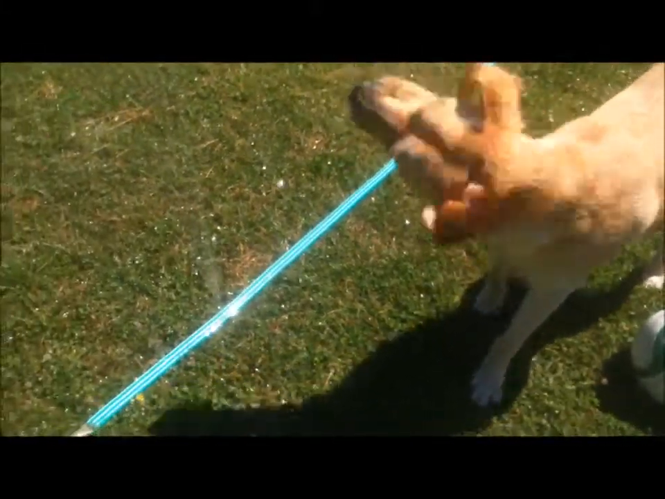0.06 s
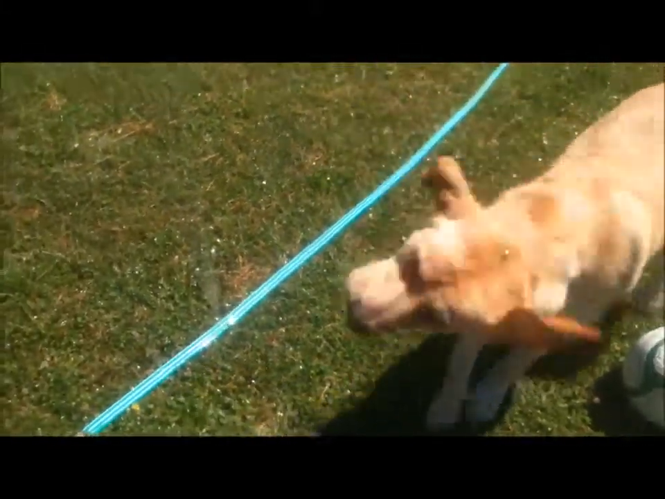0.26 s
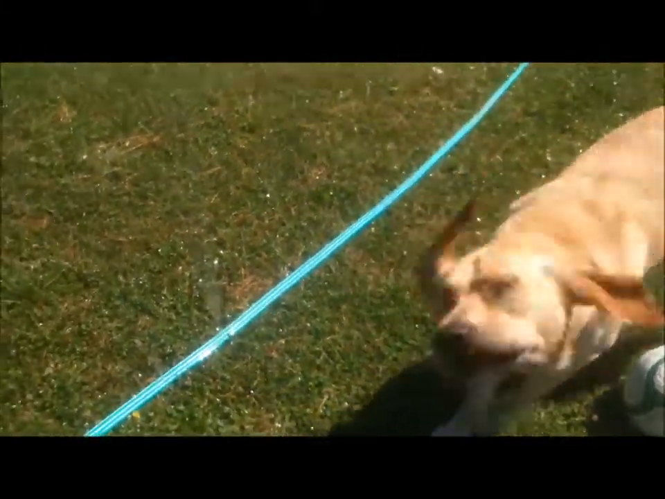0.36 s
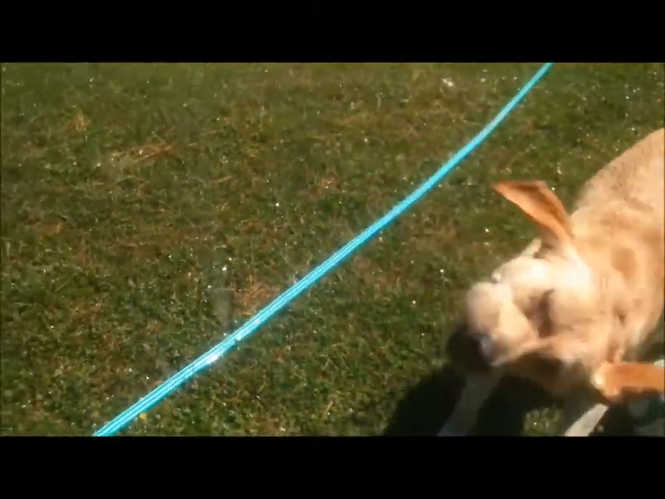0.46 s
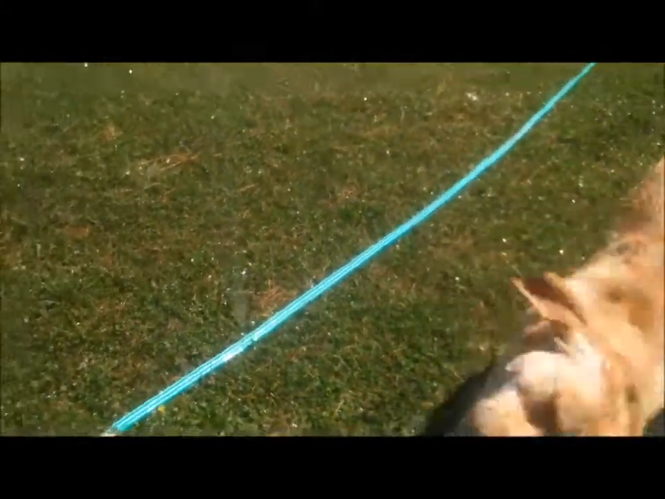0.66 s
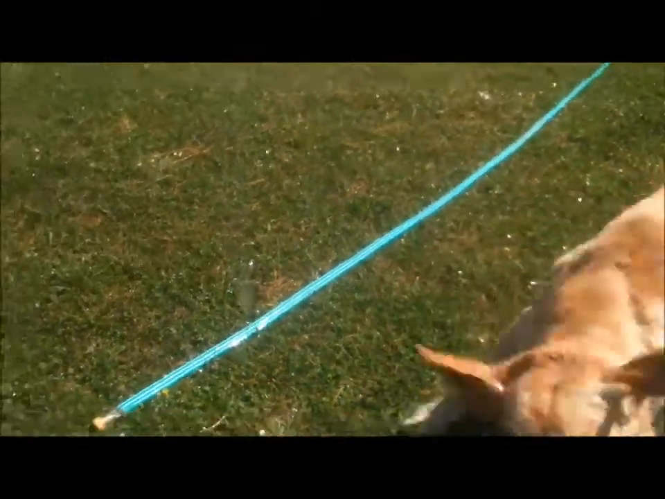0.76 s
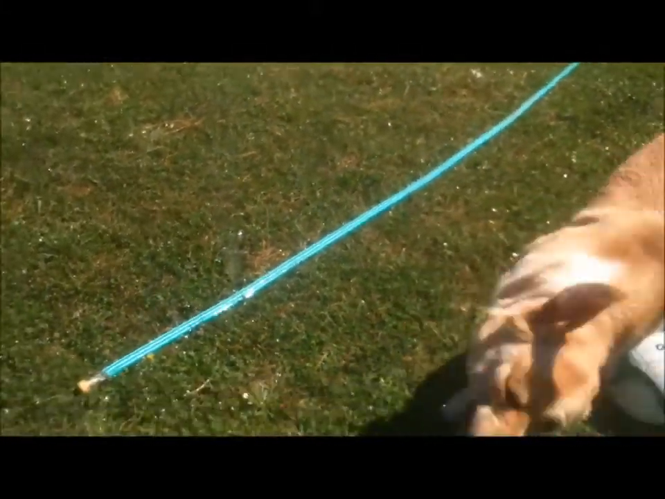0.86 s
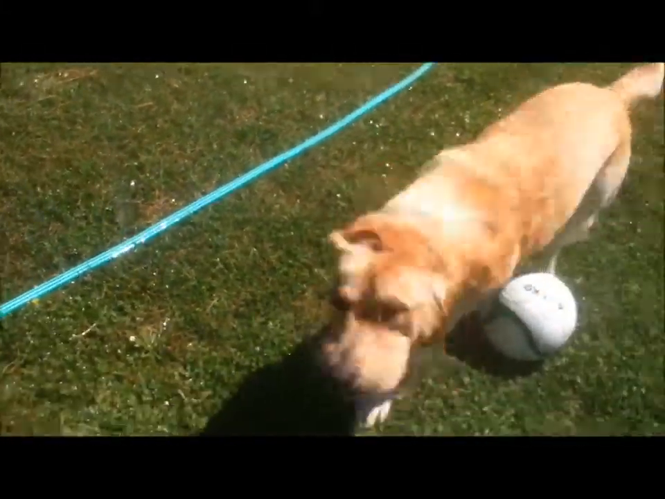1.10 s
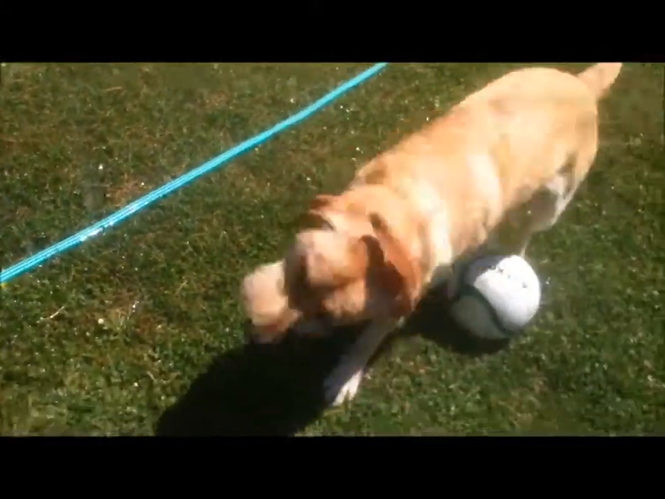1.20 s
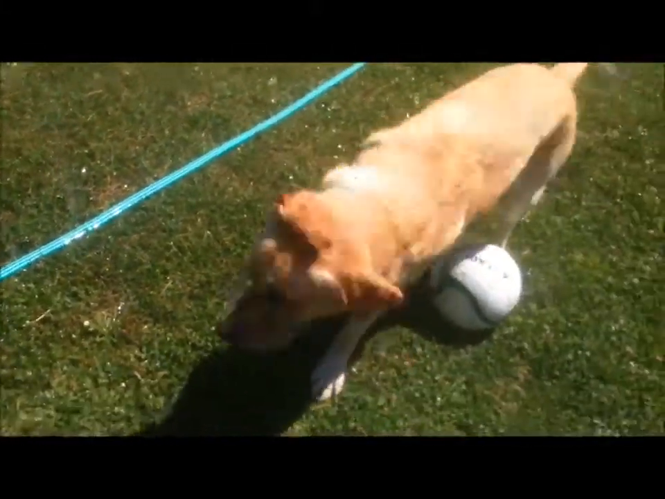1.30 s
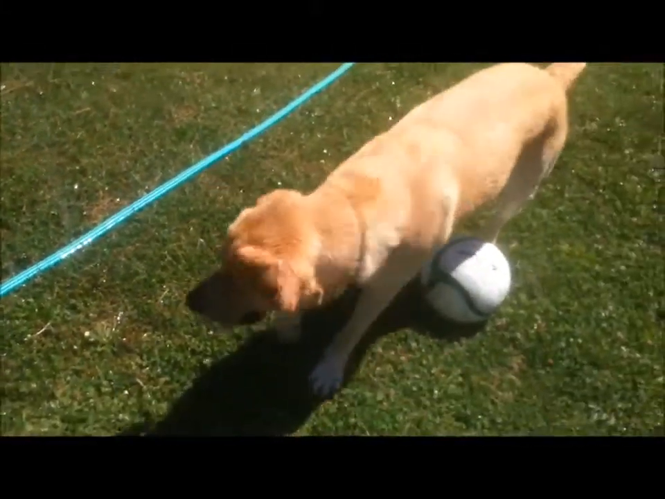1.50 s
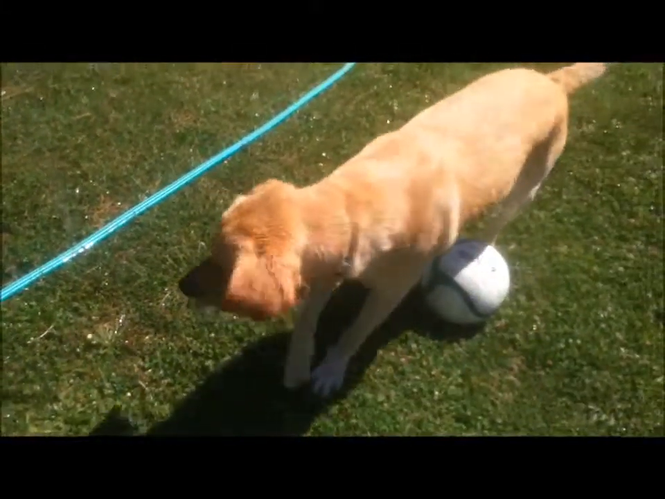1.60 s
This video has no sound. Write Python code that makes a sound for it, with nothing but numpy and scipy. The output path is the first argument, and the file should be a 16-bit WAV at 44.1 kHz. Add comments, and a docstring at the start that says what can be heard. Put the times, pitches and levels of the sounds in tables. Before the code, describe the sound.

Close by on a lawn, a dog's wet ears flap in a fast burst of slaps as it shakes its head, with light fur rustle and ticking drops. A faint hose hiss and low outdoor rumble continue underneath.

```python
"""A wet dog shakes its head on a lawn, close by. Ears and lips slap about eleven times a second:
each slap is a thump of trapped air, a clap of skin and a wet crack, a few milliseconds apart.
The mouth rings once with the second slap. Fur rustles, drops tick, cheeks pop, the turf thuds dully.
A sprinkler hose hisses over a low outdoor rumble."""
import numpy as np
from scipy import signal
from scipy.fft import rfft, irfft
import sys
import numpy as np
from scipy import signal
from scipy.fft import rfft, irfft
from scipy.io import wavfile

SR = 44100
rng = np.random.default_rng(int(sys.argv[2]) if len(sys.argv) > 2 else 0)


def wav_record(signal):
    """Record a signal, one row per channel, as 16-bit PCM in the file named by sys.argv[1]."""
    frames = np.transpose(np.atleast_2d(signal))
    bounded = np.clip(frames, -1, 1)
    # unit amplitude maps onto the largest positive 16-bit level
    quanta = np.round(bounded * 32767).astype(np.int16)
    wavfile.write(sys.argv[1], SR, quanta)


N = 72765
T = np.arange(N) / SR
HZ = np.maximum(np.fft.rfftfreq(N, 1 / SR), 1)

# Vigour of the shake. Each row: time in seconds, rustle level in dB.
FUR_LEVEL = [(0, -59), (.2, -56), (.35, -50), (.41, -51.5), (.55, -51), (.7, -51), (.9, -50), (1.15, -51),
             (1.33, -50.5), (1.42, -52), (1.5, -60), (1.65, -56)]
# Fur spectrum. Each row: frequency in Hz, relative density in dB.
FUR_SPECTRUM = [(60, -49), (120, 2.5), (400, 4.5), (800, -6), (1500, -4.5), (3500, -5), (7000, -3.5),
                (10000, -7.5), (16000, -21.5)]
# Hose hiss over time. Each row: time in seconds, level in dB.
SPRAY_LEVEL = [(0, -50.5), (.5, -54.5), (1.2, -54), (1.5, -52.5), (1.65, -54.5)]
# Spectrum of spray and open air. Each row: frequency in Hz, relative density in dB.
SPRAY_SPECTRUM = [(60, -5), (150, -6.5), (300, -4), (430, -5), (600, -13), (1000, -10), (1500, -13.5),
                  (2500, -15), (4000, -12.5), (5800, -6), (7500, -5), (10000, -11), (12500, -20),
                  (16000, -23)]
# Rumble over time. Each row: time in seconds, level in dB.
RUMBLE_LEVEL = [(0, -58.5), (.3, -52.5), (.4, -65.5), (.6, -52), (.78, -52.5), (.87, -56.5), (1.25, -48),
                (1.4, -55.5), (1.65, -63)]
# Rumble spectrum. Each row: frequency in Hz, relative density in dB.
RUMBLE_SPECTRUM = [(20, -31), (38, -54), (50, 1.5), (62, -8.5), (85, -10), (120, -14.5), (250, -46)]
# Drop and lip ticks. Each row: time in seconds, level in dB, centre in Hz, width in octaves,
# length in seconds.
TICKS = [(0.05, -64, 7500, .5, 0.0026), (0.0897, -36.5, 7900, .5, 0.0012),
         (0.134, -47.5, 1960, 1.4, 0.0029), (0.2665, -46, 2170, 0.94, 0.0047),
         (0.289, -46, 1760, 0.18, 0.005), (0.291, -25, 10400, 0.26, 0.0013),
         (0.338, -30.5, 4200, 0.37, 0.0018), (0.361, -45, 2200, 2, 0.0071),
         (0.447, -41.5, 5930, 2.7, 0.0078), (0.5193, -32, 8800, 0.31, 0.0026),
         (0.5194, -36.5, 3500, 0.27, 0.0033), (0.553, -47, 6000, 0.89, 0.0016),
         (0.588, -45, 2780, 0.12, 0.0033), (0.6183, -36.5, 4170, 0.18, 0.0012),
         (.619, -35.5, 9800, .3, 0.0012), (0.684, -34, 3860, 1.2, 0.0018), (0.709, -44.5, 3000, 2, 0.012),
         (.7778, -39.5, 4900, 0.79, 0.0062), (.892, -38.5, 4900, 3.9, 0.0044),
         (0.973, -44.5, 3850, 0.6, 0.0035), (1.0755, -28, 7870, 0.27, 0.0024),
         (1.157, -42, 5200, 0.56, 0.0054), (1.251, -43, 2580, 0.9, 0.0037), (1.337, -44, 4200, 0.85, 0.011),
         (1.4, -34.5, 4820, 0.72, .002)]
# Ear slaps. Each row: crack time in seconds, level in dB, length in seconds, treble tilt in dB/octave,
# fold resonance in Hz, its boost in dB; thump lead in seconds, pitch in Hz, ring in seconds,
# level in dB; clap lead in seconds, centre in Hz, level in dB.
SLAPS = [ (0.2298, -24.5, .0014, 1.5, 9300, 17.5, 0.0037, 446, 0.0031, -39, 0.0011, 1380, -23),
         (0.3202, -21.5, 0.0028, 0.5, 10460, 14.5, .001, 330, 0.0027, -22.5, 0.0014, 1220, -30.5),
         (0.453, -28, 0.0021, -1.5, 5150, 7, 0.0059, 399, 0.0074, -32, -0.0012, 990, -25),
         (0.5624, -34, 0.0045, 0, 7400, 10, .0083, 456, 0.0036, -32, .009, 1070, -36.5),
         (.6500, -21, .0038, 3.5, 5600, 5.5, -0.0011, 404, 0.0051, -27.5, 0.0019, 1530, -36),
         (0.7463, -18.5, .0025, 4.5, 8250, 2, 0.0049, 435, 0.002, -30.5, 0.0028, 1700, -52),
         (.8340, -19.5, .0031, -0.5, 3640, 11.5, .0015, 437, .003, -17, 0.0077, 1050, -28),
         (0.9307, -26, 0.0048, 3.5, 6260, 7, 0.0093, 414, 0.004, -23.5, 0.005, 1050, -37),
         (1.0185, -22.5, 0.0045, -0.5, 2950, 7.5, .004, 467, 0.0046, -21, 0.00385, 697, -28.5),
         (1.1136, -25.5, 0.0042, -1, 7140, 9, 0.0061, 366, 0.0018, -21, 0.0074, 950, -29.5),
         (1.205, -21.5, 0.0036, -0.5, 3750, 8, 0.0079, 399, .0038, -20.5, 0.0074, 930, -30.5),
         (1.2916, -25, 0.0037, 1, 5300, 5.5, 0.005, 306, 0.0021, -27.5, .0015, 1000, -36.5),
         (1.3823, -41, 0.0083, -6, 5870, 11.5, .0026, 340, 0.0023, -29.5, .0003, 930, -46)]
# Wet crack spectrum. Each row: frequency in Hz, relative density in dB.
CRACK_SPECTRUM = [(500, -1), (1400, -5.5), (1800, 2), (2300, -0.5), (2800, -4.5), (3400, 9.5), (3700, 1),
                  (4000, 4), (4700, 7), (5400, 0), (6000, 4), (7600, 0), (9800, 0), (12000, -9.5),
                  (16000, -26)]
# Lip and cheek pops. Each row: start in seconds, level in dB, pitch in Hz.
POPS = [(.261, -40, 1010), (.372, -39, 420), (.681, -37, 775), (.774, -40, 748), (.860, -44, 780),
        (1.136, -34, 800), (1.228, -37, 786), (1.318, -39, 794), (1.423, -47, 603)]
# Open-mouth modes. Each row: frequency in Hz, level in dB, T60 in seconds.
MOUTH_MODES = [(714, -18, 0.036), (1830, -23.5, 0.024), (4070, -12.5, 0.017), (9930, -20.5, 0.014)]
# Thuds, as of paws on turf. Each row: time in seconds, pitch in Hz, peak in dB.
THUDS = [(.455, 58, -46), (.555, 66, -46), (.713, 68, -39), (.92, 72, -45), (1.075, 72, -47),
         (1.195, 72, -46)]


def from_db(db):
    """Decibels to gain."""
    return 10 ** (np.asarray(db) / 20)


def level(rows):
    """Gain over time from (s, dB) points."""
    return from_db(np.interp(T, *np.transpose(rows)))


def spectrum_db(points):
    """dB per bin from (Hz, dB) points."""
    hz, db = np.transpose(points)
    return np.interp(np.log(HZ), np.log(hz), db)


def resonance_db(hz, octaves, skirt_db):
    """Broad resonance on a low skirt, dB per bin."""
    offset_oct = np.log2(HZ / hz)
    peak = np.exp(-.5 * (offset_oct / octaves) ** 2)
    return 20 * np.log10(peak + from_db(skirt_db) / (1 + offset_oct ** 4))


def noise(shape_db, grain_db=0):
    """Coloured noise, rms 1; grain_db makes the grains uneven."""
    grains = rng.standard_normal(N) * from_db(grain_db * np.minimum(rng.exponential(1, N), 6))
    x = irfft(rfft(grains) * from_db(shape_db), N)
    return x / np.std(x)


def swell(peak_s, rise_s, fall_s):
    """Envelope: rounded rise to 1, then decay."""
    t = T - peak_s
    return np.where(t < 0, np.exp(-(t / rise_s) ** 2), np.exp(1 - np.sqrt(1 + (2 * t / fall_s) ** 2)))


def spatter(peak_s, length_s, shape_db):
    """Burst of tiny contacts, then faint scatter from the surroundings."""
    envelope = swell(peak_s, rise_s=.65 * length_s, fall_s=length_s)
    direct = noise(shape_db, grain_db=3) * envelope
    direct *= np.sqrt(np.sum(envelope ** 2) / np.sum(direct ** 2))
    scatter = noise(shape_db) * swell(peak_s + length_s, rise_s=length_s, fall_s=.0112)
    return direct + from_db(-28) * scatter


def cavity(start_s, hz, db, t60_s, rise_s=.0016):
    """One damped mode of an air cavity."""
    t = np.maximum(T - start_s, 0)
    decay = from_db(db - 60 * np.minimum(t / t60_s, 2))
    return decay * (1 - np.exp(-t / rise_s)) * np.sin(2 * np.pi * hz * t)


def fur_rustle(gain):
    """Wet fur rustles in fine grains."""
    return gain * noise(spectrum_db(FUR_SPECTRUM), grain_db=2.4)


def hose_spray():
    """Fine spray gives a grainy hiss."""
    return level(SPRAY_LEVEL) * noise(spectrum_db(SPRAY_SPECTRUM), grain_db=2.5)


def rumble():
    """Low outdoor noise, wavering in level."""
    return level(RUMBLE_LEVEL) * noise(spectrum_db(RUMBLE_SPECTRUM))


def wet_ticks(top_hz=10500):
    """Small wet contacts of drops and lips, dull at the very top."""
    lowpass_db = -10 * np.log10(1 + (HZ / top_hz) ** 10)
    return sum(from_db(db) * spatter(at_s, length_s, lowpass_db + resonance_db(hz, octaves, skirt_db=-44))
               for at_s, db, hz, octaves, length_s in TICKS)


def air_thump(peak_s, hz, ring_s, push_hz=219.5, push_db=-11):
    """Air squeezed from under the ear rings briefly over a duller push."""
    rad_per_hz = 2 * np.pi * (T - peak_s)
    pocket = np.cos(hz * rad_per_hz + rng.uniform(-.48, .8)) * swell(peak_s, .44 * ring_s, ring_s)
    push = np.sin(push_hz * rad_per_hz) * swell(peak_s, rise_s=.0042, fall_s=.0034)
    return pocket + from_db(push_db) * push


def ear_slaps(brush_db=-12.5, brush_rise_s=.0034, clap_length_s=.0029, fold_width_oct=.13):
    """An ear lands on the head: brush of fur, thump, clap of skin, crack of the wet tip."""
    out = np.zeros(N)
    for (crack_s, crack_db, length_s, tilt_db_per_oct, fold_hz, fold_db,
         thump_lead_s, thump_hz, ring_s, thump_db, clap_lead_s, clap_hz, clap_db) in SLAPS:
        clap_s = crack_s - clap_lead_s
        clap_shape_db = resonance_db(clap_hz, octaves=.31, skirt_db=-12)
        snap_db = fold_db * np.exp(-.5 * (np.log2(HZ / fold_hz) / fold_width_oct) ** 2)
        tilt_db = tilt_db_per_oct * np.log2(np.maximum(HZ, 2000))
        crack_shape_db = spectrum_db(CRACK_SPECTRUM) + snap_db + tilt_db
        out += fur_rustle(from_db(crack_db + brush_db) * swell(clap_s, brush_rise_s, length_s))
        out += from_db(thump_db) * air_thump(crack_s - thump_lead_s, thump_hz, ring_s)
        out += from_db(clap_db) * spatter(clap_s, clap_length_s, clap_shape_db)
        out += from_db(crack_db) * spatter(crack_s, length_s, crack_shape_db)
    return out


def cheek_pops():
    """Small air pockets open in lips and cheeks."""
    return sum(cavity(start_s, hz, db, t60_s=.045) for start_s, db, hz in POPS)


def mouth_ring(start_s=.3202):
    """The open mouth rings once with the second slap."""
    return sum(cavity(start_s, hz, db, t60_s) for hz, db, t60_s in MOUTH_MODES)


def turf_thuds():
    """Soft ground gives a few deep cycles under the dog's weight."""
    return sum(from_db(db) * np.cos(2 * np.pi * hz * (T - at_s)) * swell(at_s, rise_s=.018, fall_s=.018)
               for at_s, hz, db in THUDS)


def scene():
    """Dog and garden, mono."""
    dog = ear_slaps() + wet_ticks() + cheek_pops() + mouth_ring() + turf_thuds()
    dog += fur_rustle(level(FUR_LEVEL))
    return (dog + hose_spray() + rumble())[None]


def record(dry, low_hz=35, top_hz=16100):
    """Microphone bass roll-off and a steep top cut."""
    x = signal.sosfilt(signal.butter(2, low_hz, "high", fs=SR, output="sos"), dry)
    return irfft(rfft(x) / np.sqrt(1 + (HZ / top_hz) ** 200), N)


dry = scene()
out = record(dry)
wav_record(out)
```